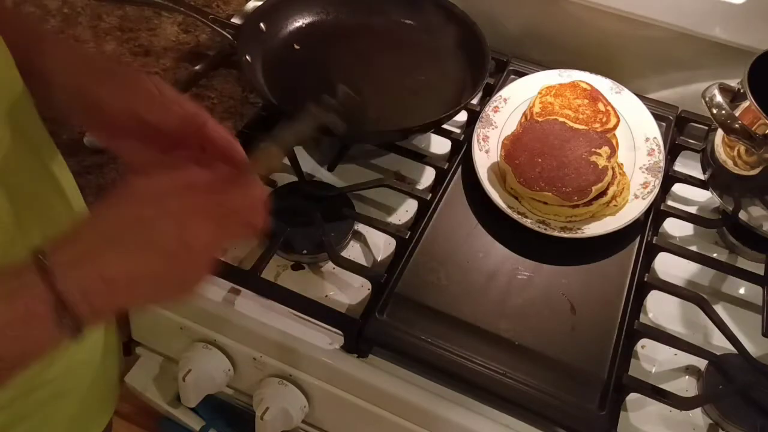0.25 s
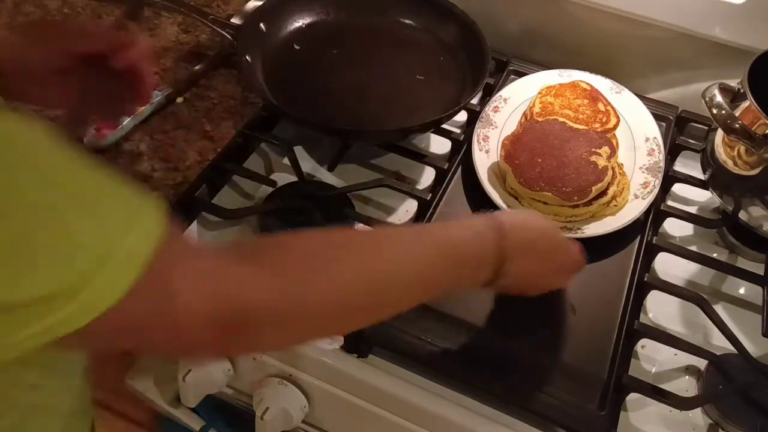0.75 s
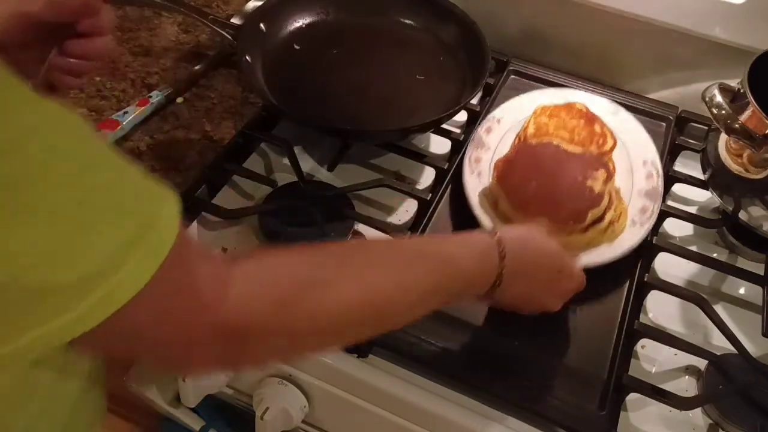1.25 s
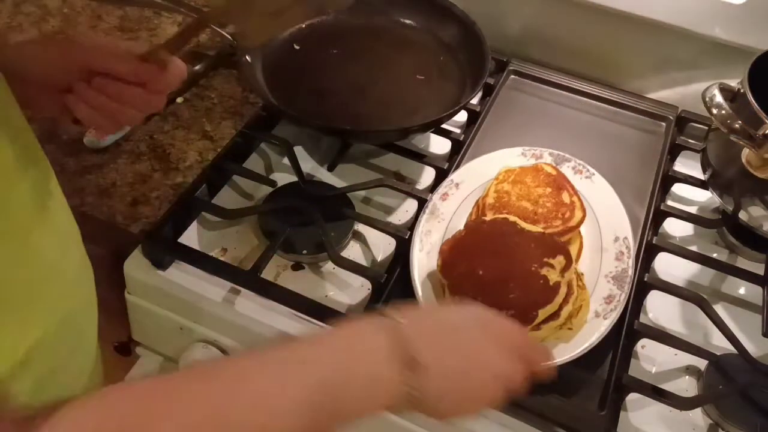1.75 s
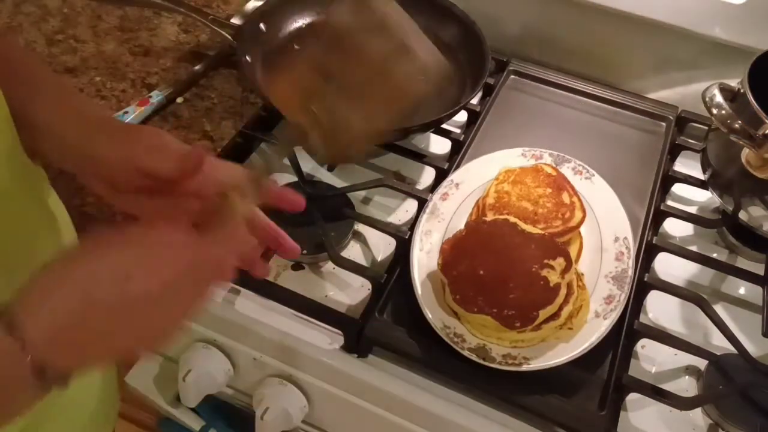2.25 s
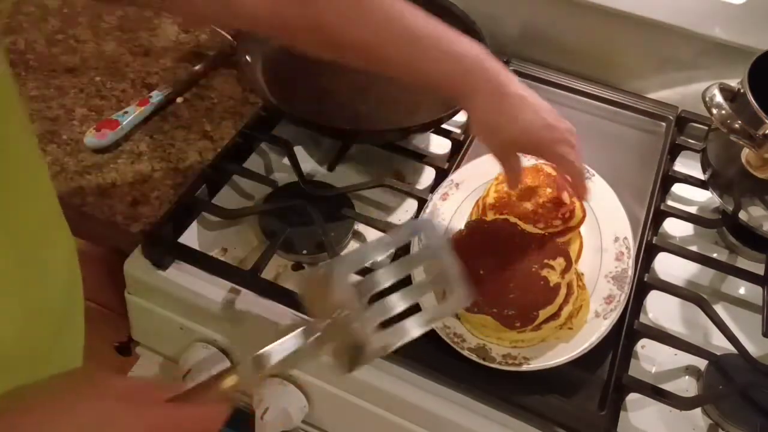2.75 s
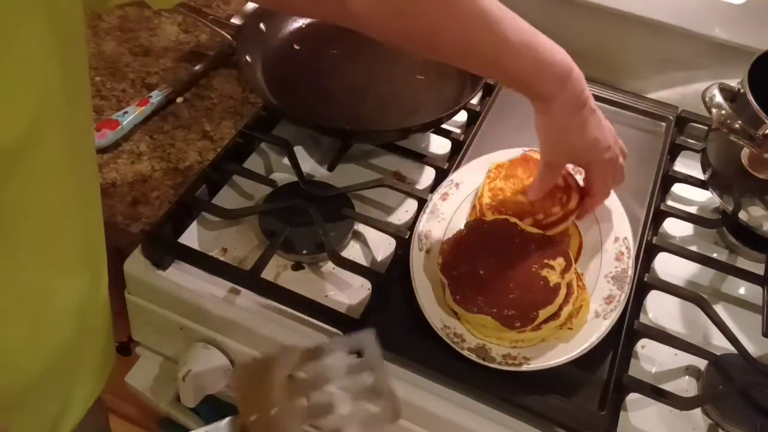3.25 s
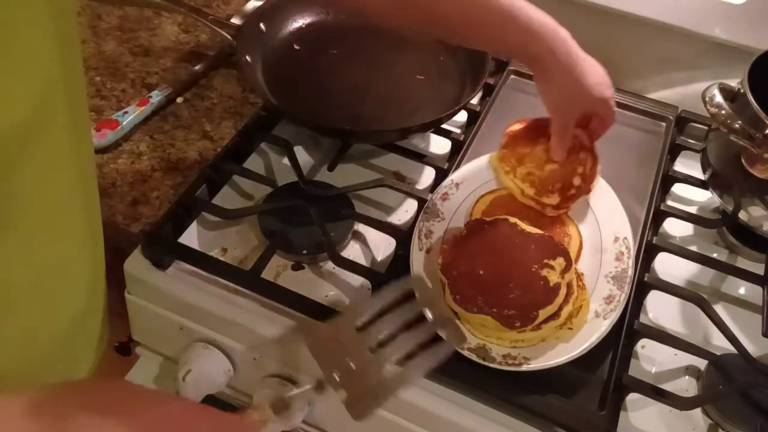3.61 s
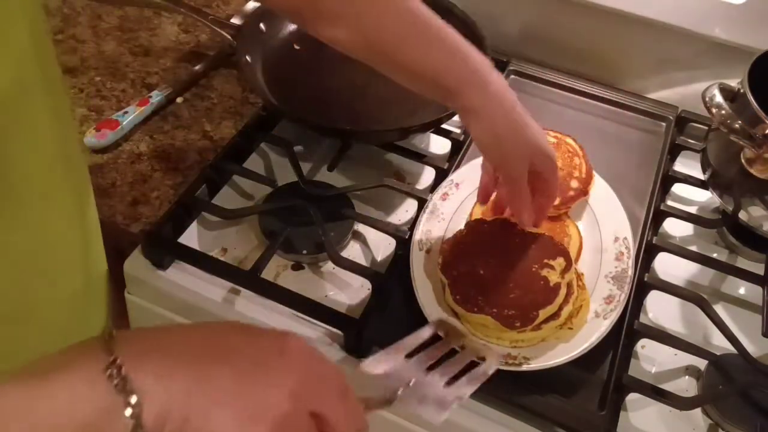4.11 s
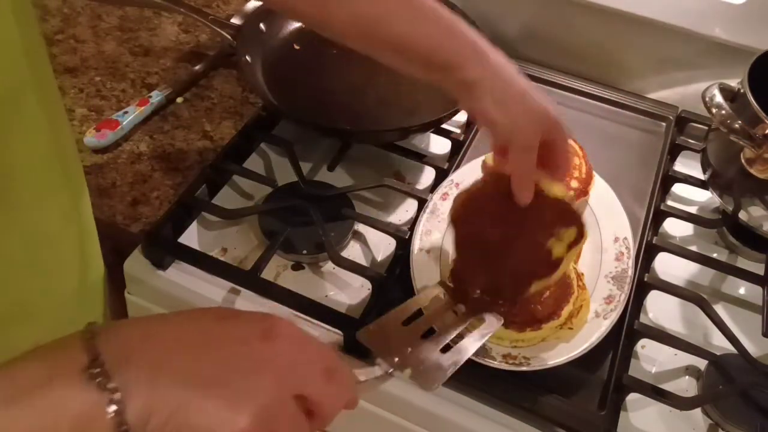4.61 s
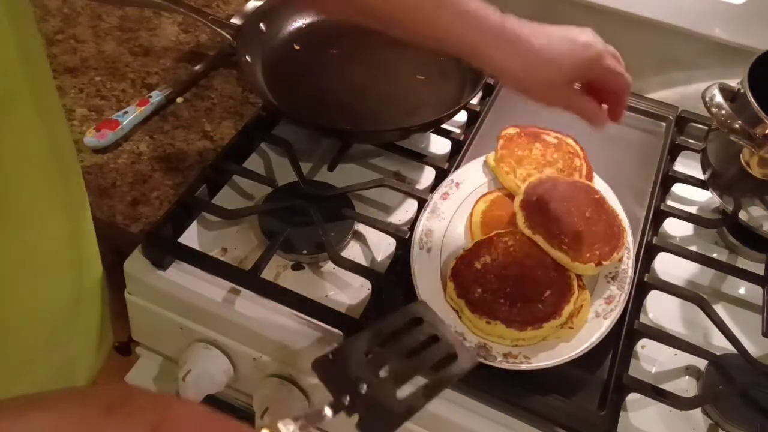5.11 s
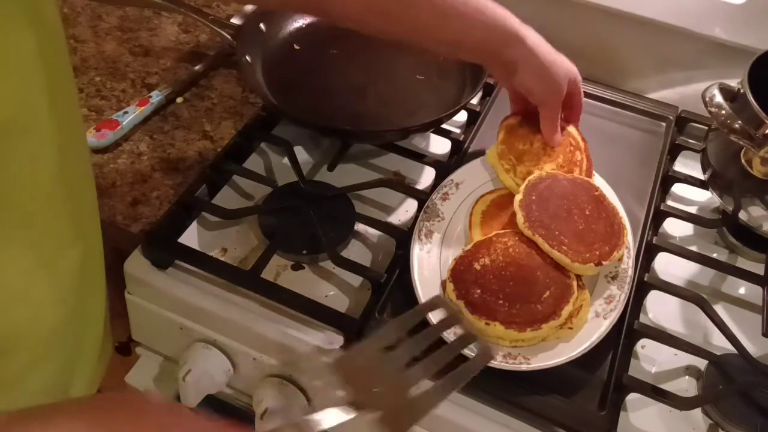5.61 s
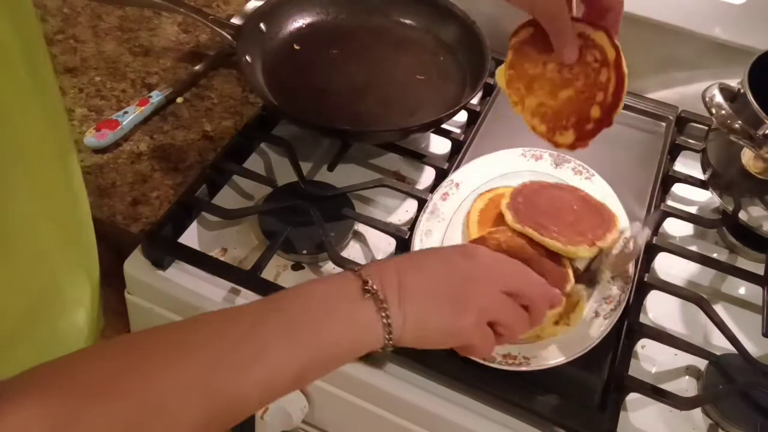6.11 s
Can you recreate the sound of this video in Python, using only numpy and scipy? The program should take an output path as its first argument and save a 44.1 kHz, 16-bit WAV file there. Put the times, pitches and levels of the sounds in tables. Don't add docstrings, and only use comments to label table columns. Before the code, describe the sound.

In a humming kitchen, a plate scrapes harshly over a stove griddle and bangs down, followed by spatula clinks, a second knock and faint crust crackle.

```python
import sys
import numpy as np
from scipy import signal
from scipy.fft import rfft, irfft, next_fast_len
from scipy.io import wavfile
from scipy.ndimage import uniform_filter1d

SR = 44100
rng = np.random.default_rng(int(sys.argv[2]) if len(sys.argv) > 2 else 0)


def volts(x):
    e = np.asarray(x, float) / 20
    return 10 ** e


def dump(signal):
    limited = np.clip(np.atleast_2d(signal).T, -1, 1)
    pcm = np.round(limited * 32767).astype(np.int16)
    wavfile.write(sys.argv[1], SR, pcm)


N = 280413
TIME = np.arange(N) / SR


def at(points, hz):
    f, v = np.transpose(points)
    return np.interp(np.log(np.maximum(hz, 1)), np.log(f), v)


def colour(x, points):
    n = next_fast_len(x.shape[-1] + 4096)
    log_gain = at(points, np.fft.rfftfreq(4096, 1 / SR)) * np.log(10) / 20
    cepstrum = irfft(log_gain)
    cepstrum[1:2048] *= 2
    cepstrum[2049:] = 0
    impulse = irfft(np.exp(rfft(cepstrum)))
    return irfft(rfft(x, n) * rfft(impulse, n), n)[..., :x.shape[-1]]


def band(x, lo_hz, hi_hz, order=2):
    sos = signal.butter(order, [lo_hz, min(hi_hz, .45 * SR)], "band", fs=SR, output="sos")
    return signal.sosfilt(sos, x)


def ring(x, hz, width_hz):
    return signal.lfilter(*signal.iirpeak(hz, hz / max(width_hz, 1), SR), x)


def unit(x):
    return x / np.sqrt(np.mean(x ** 2))


def walk(rate, size=N):
    k = int(SR / rate)
    held = np.repeat(rng.standard_normal(size // k + 1), k)
    return 0.93 * uniform_filter1d(uniform_filter1d(held, k), k)[:size]


def grains(size, share, scatter_db):
    u = rng.random((3, size))
    sign = np.sign(u[1] - .5)
    return unit((u[0] < share) * sign * volts(-scatter_db * np.log(1 - u[2])))


def swell(s, db, rise, fall):
    late = TIME[:, None] - s
    return np.sum(volts(db) * np.exp(-(late / np.where(late < 0, rise, fall)) ** 2), axis=1)


def add(out, x, s):
    i = int(s * SR)
    out[i:i + len(x)] += x[:N - i]


# time in seconds, gain in dB.
SLOW_GAIN = [(0, -0.5), (.6, 7.5), (1.2, 8), (1.5, 1.5), (1.9, 0), (2.08, -1.5), (2.7, 3), (3.7, 7.5),
             (4.3, 6.5), (5.0, 6.5), (5.1, 6), (5.6, 7.5), (6.36, 8.5)]


def slow_gain_db():
    return np.interp(TIME, *np.transpose(SLOW_GAIN))


# start in seconds, depth in dB, release in seconds.
DUCKS = [
    (1.114, 6, 0.092),
    (1.751, 13.5, 0.075),
    (5.05, 9.5, 0.11),
]


def gain_db():
    db = slow_gain_db()
    for s, depth_db, release in DUCKS:
        late = np.maximum(TIME - s - .025, 0)
        db = db - depth_db * np.clip((TIME - s) / .003, 0, 1) * np.exp(-late / release)
    return db


# peak in seconds, casing ring in dB, thud in dB, fall in seconds.
STEPS = [(.09, -43.5, -57.5, 0.12), (0.301, -42.5, -51, 0.17), (.5, -46, -53.5, 0.13),
         (1.26, -62, -56.5, 0.13), (1.65, -70, -53, 0.05), (1.85, -75, -54, 0.11),
         (3.122, -39.5, -84, 0.14), (3.54, -42.5, -71, 0.062), (3.77, -73, -59.5, 0.31),
         (4.11, -68, -57, 0.07), (5.1, -43, -49, 0.11), (5.26, -48, -52.5, 0.069)]


def fridge():
    s, shake_db, thud_db, fall = np.transpose(STEPS)
    rise = .08
    shake, gain = swell(s, shake_db, rise, fall), volts(slow_gain_db())
    noise = rng.standard_normal((5, N))
    casing = np.sin(2 * np.pi * 203 * TIME) * np.sqrt(2) + volts(-6.0) * unit(ring(noise[0], 203, 4.1))
    buzz = np.sin(2 * np.pi * 240 * TIME) * np.sqrt(2) + volts(-6.5) * unit(ring(noise[1], 243, 24))
    rumble = unit(band(noise[2], 88, 185))
    for hz, db in [(101, -2), (121, -5.5), (152, -1.0)]:
        rumble = rumble + volts(db) * unit(ring(noise[2], hz, 5.1))
    cabinet = unit(band(noise[3], 350, 430))
    for hz, db in [(342, 7.0), (360, 6.0), (385, -18.0)]:
        cabinet = cabinet + volts(db) * unit(ring(noise[3], hz, 5))
    thuds = swell(s, thud_db, rise, fall) + volts(-84.5)
    steps = thuds * unit(band(noise[4], 51, 120, order=3))
    cabinet_level = (volts(-64.0) * gain + volts(-21.5) * shake) * volts(2.0 * walk(3.0))
    return ((volts(-54) * gain + shake) * unit(casing)
            + (volts(-55.5) * gain + volts(-5.0) * shake) * unit(buzz)
            + (volts(-67) * gain + volts(-21) * shake) * unit(rumble)
            + cabinet_level * unit(cabinet) + steps)


# frequency in Hz, level in dB per Hz.
HISS_TONE = [(260, -36.5), (400, -9), (620, 1), (900, -7), (1750, -13), (2800, -17), (3720, -14.5),
             (4500, -22), (5100, -12.5), (7500, -6), (8300, -19.5), (9600, -26.5), (11000, -40),
             (15800, -58.5)]
# frequency in Hz, width in Hz, level in dB.
FAN = [(800, 40, -6), (2530, 60, -12), (3420, 50, -14), (3700, 70, -15), (5030, 120, -11), (6200, 110, -5),
       (7350, 130, -2)]


def air():
    white = rng.standard_normal((3, N))
    overtones = sum(volts(db + 6.5 * walk(5.7)) * unit(ring(white, f, w)) for f, w, db in FAN)
    hiss_db = -66.5 + 1.2 * walk(11) + 2.5
    hiss = (unit(colour(white, HISS_TONE)) + volts(-7.5) * overtones) * volts(hiss_db)
    whine_db = -79.5 + 3 * np.minimum(TIME, 4) + 0.5 + 2.2 * walk(2.9)
    whine = volts(whine_db) * np.sin(2 * np.pi * 5022 * TIME)
    return volts(-14.5) * hiss[0] + whine, volts(1.0) * hiss[1:]


# frequency in Hz, time to fall 60 dB in seconds.
ROOM_T60 = [(100, .38), (800, 0.23), (1800, 0.26), (12000, 0.18)]


def room(x):
    t = np.arange(int(.6 * SR)) / SR
    octaves = 100 * 2 ** np.arange(8)
    noise = rng.standard_normal((2, len(t))) * np.clip(t / 0.011, 0, 1)
    tail = sum(band(noise, f, 2 * f) * volts(-60 * t / at(ROOM_T60, 1.4 * f)) for f in octaves)
    return signal.fftconvolve(x[None], tail / np.sqrt(np.sum(tail[0] ** 2)), axes=1)[:, :N]


# start in seconds, peak in dB, pitch in Hz, length in seconds.
TICKS = [(0.401, -45, 7430, 0.039), (0.487, -50.5, 7060, 0.034), (0.926, -46, 7630, 0.0039),
         (0.962, -54, 9360, 0.0052), (0.998, -52.5, 8760, 0.0061), (2.65, -57.5, 5050, .01),
         (3.4603, -41, 7350, 0.004), (4.616, -40, 7640, 0.0046), (5.728, -48.5, 7000, .02),
         (6.319, -50, 7300, 0.011)]


def ticks():
    out, t = np.zeros(N), np.arange(SR // 8) / SR
    for s, db, hz, length in TICKS:
        push = rng.standard_normal(len(t)) * np.exp(-t / max(length, .001))
        tick = unit(ring(ring(push, hz, 1100), hz, 1100)) + volts(-16.5) * unit(band(push, 5000, 15000))
        add(out, tick * volts(db) / np.abs(tick).max(), s - .001)
    return out


# peak in seconds, level in dB, rise in seconds, fall in seconds.
PEELS = [(3.25, -58, 0.024, 0.045), (3.469, -49.5, 0.007, 0.042), (3.559, -43, 0.089, 0.056),
         (4.525, -60, 0.03, 0.021), (4.68, -43.5, 0.055, 0.086), (4.743, -38, 0.031, 0.019),
         (5.791, -41.5, 0.069, 0.037), (5.829, -45, 0.029, 0.011), (6.055, -52, 0.014, 0.034),
         (6.14, -48.5, 0.031, .022)]
# frequency in Hz, level in dB per Hz.
CRUST = [(600, -58), (1100, -19), (2000, -14.5), (3300, -5), (4500, 1.5), (6000, 1), (7400, 7.5),
         (8500, -6), (10000, -17), (15500, -18)]


def peels():
    rub = rng.standard_normal(N) + volts(-3.5) * grains(N, 0.093, 7.1)
    crust = colour(rub, CRUST) * volts(2.0 * walk(90))
    layers = [unit(band(crust, lo, hi)) for lo, hi in [(700, 3480), (4500, 11200), (9900, 18600)]]
    low, mid, top = (layer * volts(2.5 * walk(35)) for layer in layers)
    stroke = swell(*np.transpose(PEELS))
    return stroke * (mid + volts(-6.5) * low) + volts(-1.5) * stroke ** 1.3 * top


# time in seconds, level in dB.
DRAG = [(1.145, -34), (1.18, -35), (1.215, -22), (1.3, -19), (1.45, -21.5), (1.56, -22), (1.635, -26.5),
        (1.72, -43)]
PLATE_HZ = [746, 933, 996, 1203, 1280, 1429, 1464, 1576, 1879, 2002, 2175, 2276, 2595, 2921, 3340, 3510,
            3916, 4140, 4480, 4781, 5305, 5676, 5908, 6060, 6200, 6883, 7120, 7485, 8320, 8710, 9280, 9700,
            9950, 10350, 10900, 11350, 11850, 12400]
# width in Hz, dB early in the slide, dB late.
PLATE = [(8, -9, -14), (16, -7.5, -5), (14, -10.5, -7), (28, 0.5, -1.5), (25, -2.5, -7.5), (14, 0, 2),
         (13.9, -2.5, -2), (9, -11, -9.5), (20, -2, -2.5), (14, -11, -10.5), (18.03, 2, -3.5), (14, -5, -1),
         (18, -2, -4.5), (18, -3.5, -10), (40, -16.5, -10.5), (40, -13.5, -12.5), (22, -6.5, -13),
         (22, -21.5, -17.5), (40.1, -17.5, -15), (12, -7.5, -7.5), (25, -19, -14.5), (13.01, -12.5, -8),
         (13.05, -9.5, -17), (14, -20.5, -16), (14, -23.5, -12), (20, -5, -13.5), (30, -19.5, -14.5),
         (24.8, -18, -14.5), (20, -24, -24), (11, -20, -21), (16, -25.5, -27), (16, -33, -28.5),
         (18, -28, -27.5), (20, -41, -39), (14, -29.5, -38), (16.1, -34, -31), (16, -31, -29),
         (14, -48, -38)]
# frequency in Hz, level in dB per Hz.
GRIT = [(310, -63), (520, -23.5), (738, -4.5), (1410, 1.5), (1750, -11), (2230, -13), (2650, -8.5),
        (3120, -13), (3920, -11.5), (4190, -21.5), (4670, -20.5), (7090, -15.5), (8400, -33), (9300, -56),
        (15000, -85.5)]


def drag():
    s, level_db = np.transpose(DRAG)
    size = int((s[-1] - s[0]) * SR)
    t = np.arange(size) / SR
    db = np.interp(s[0] + t, s, level_db)
    edge_db = -11.5 + 7 * t - 6.0 * np.exp(-t / .05)
    griddle_db = -13 - 7.5 * t
    slip = grains(size, .3, 1.3) * volts(2.0 * walk(160, size=size))
    moved = np.clip((t - .13) / 0.23, 0, 1)
    modes = np.zeros(size)
    for k, (hz, (width, early, late)) in enumerate(zip(PLATE_HZ, PLATE)):
        mode_db = early + (late - early) * moved + 4.2 * walk(28, size=size)
        modes += (-1) ** k * volts(mode_db) * ring(ring(slip, hz, 1.3 * width), hz, 600)
    body = unit(modes) + volts(1.0) * unit(colour(slip, GRIT))
    griddle = band(ring(slip, 368, 17) + volts(-4) * ring(slip, 430, 50.8), 320, 440)
    edge = unit(band(body, 3600, 15000, order=3)) * volts(3.7 * walk(30, size=size))
    middle = unit(band(body, 650, 3600, order=3))
    out = np.zeros(N)
    add(out, volts(db) * (middle + volts(edge_db) * edge + volts(griddle_db) * unit(griddle)), s[0])
    return out


# frequency in Hz, width in Hz, level in dB.
TIP = [(451.4, 25, -4), (990, 25, -3), (1425, 30, 4), (1880, 30, -8), (2185, 40, 0), (2590, 30, -4),
       (2925, 30, -5), (3480, 56, -17), (4780, 30, -30), (6000, 56, -28.5), (6880, 36, -20),
       (8200, 36, -49.5)]
CATCH = [(362, 11, -5), (601, 40, -5.5), (1026, 13, 6.5), (2124, 23, -4), (2560, 49, -13.5),
         (6310, 20, -24.5), (7250, 220, -24), (7240, 22, -21), (8320, 50, -41.5)]
DROP = [(1030, 9.1, -21.5), (1395, 30, 0), (1610, 45.8, -5), (1913, 92, -5.5), (2242, 22.3, -0.5),
        (2600, 10, -3.5), (2870, 49, -9), (3630, 11.2, -10.5), (3963, 64, -18), (5600, 46.6, -18),
        (5670, 35.4, -23.5), (7060, 30, -11), (8280, 30, -41.5)]
NUDGE = [(1006, 60, -2), (1260, 55, 0), (2640, 40, -7), (4700, 40, -4), (7200, 60, -13)]
THUD = [(330, 35, -1), (514, 40, 0), (800, 55, -18), (1400, 97, -24)]
RIM = [(1013, 27, -7), (1308, 29, -12), (1859, 18, -5.5), (2010, 68, -6.5), (2420, 15, -11.5),
       (2654, 9, 5.5), (3640, 18, -14), (3960, 30, -22), (4651, 50, -10.5), (5800, 82, -15.5),
       (5940, 21, -17), (7204, 26, 0.5), (8600, 24, -20), (9600, 64, -27)]
EDGE = [(587, 16, -7.5), (1125, 24, -5.5), (1750, 39, -11), (2260, 30, -6), (2580, 9, -6.5), (3380, 11, -9),
        (3714, 90, -12.5), (4710, 48, -12), (6000, 30, -6), (5830, 77, -12), (6780, 150, -23),
        (7110, 18, -0.5), (8600, 35, -18), (9670, 42, -33)]
TINK = [(1860, 23, -4), (2580, 28, -7.5), (3560, 26, -4), (4550, 23, -12), (5770, 38, -15), (7270, 34, 0.5),
        (8470, 39, -21.5), (11900, 30, -38.5)]
BLADE = [(1050, 38, 3.5), (1700, 6.9, -5), (2570, 16, -8.5), (3700, 32, -7), (4620, 36, -12),
         (5720, 25, -10), (5900, 28, -10), (7120, 16, 1.5), (7980, 57, -9), (8270, 100, -13.5),
         (9260, 44, -21), (10000, 77, -26)]
ROCK = [(364, 20, -9.5), (800, 41, -3), (971, 33, 3.5), (1340, 34, -1), (1870, 82, -7), (2246, 80, -5),
        (2820, 44, -16), (3240, 20, -12), (5910, 81, -35), (6100, 36, -18.5), (7080, 66, -25.5),
        (8860, 32.4, -54)]
CHINK = [(1090, 50, -10), (1880, 40, -9), (2657, 18, -6.5), (3660, 20, -1), (4680, 37, -10), (5920, 30, -8),
         (7000, 40, -1), (7500, 40, -1), (8500, 24, -1), (9800, 60, -18)]
GRAZE = [(2660, 18, -8), (4160, 24, -7.5), (5000, 31, -15), (5440, 49, -2.5), (7460, 38, 4),
         (7850, 110, -19), (8750, 57, -16), (9860, 29, -36), (10900, 75, -30), (11600, 58, -37)]
REACHED = [TIP, CATCH, DROP, NUDGE, THUD, RIM, EDGE, TINK, BLADE, BLADE, ROCK, TINK, CHINK,
           GRAZE, GRAZE, GRAZE, RIM]
# start in seconds, peak in dB, rattle in seconds, damping factor, room level in dB.
BLOWS = [(1.1287, -10, 0.0083, 1.54, -16.5), (1.612, -9.5, 0.0054, 2.2, -24), (1.77, -5.5, 0.011, 1.8, -13),
         (3.064, -48.5, 0.008, 1.1, -21), (3.091, -42, 0.022, 1.3, -14), (3.742, -19.5, 0.009, 2.04, -9.5),
         (4.177, -20, 0.023, 1.7, -14), (4.267, -43.5, 0.0054, 0.7, -21), (5.027, -33.5, 0.0099, 2.5, -18),
         (5.035, -15, 0.0096, 4, -24), (5.063, -8.5, 0.0072, 0.68, -14), (5.164, -24, 0.0057, 1.2, -7),
         (5.864, -35, 0.008, 1.2, -10), (6.049, -36.5, .012, 0.78, -10), (6.099, -49, 0.018, 1.3, -14),
         (6.127, -41, 0.022, 1, -7), (6.349, -30.5, 0.0044, 1.9, 2)]
HEAVY = [0, 1, 2, 10]
# frequency in Hz, level in dB per Hz.
SHAKE = [(150, -23.5), (250, -10), (758, -4), (830, 0), (908, -2.5), (1210, -14), (1320, -5.5), (3060, -26),
         (7190, -28), (9000, -56), (12500, -100)]
# frequency in Hz, level in dB per Hz.
BOOM = [(150, -52), (250, -25), (337, -10.5), (529, -13.5), (736, -0.5), (1240, -6), (1680, -8),
        (1890, 0.5), (2040, -5.5), (2550, -9.5), (7190, -25.5), (9000, -48), (12500, -90)]
# frequency in Hz, width in Hz, level in dB.
AFTER_DROP = [(747, 16, -10), (1000, 16, -4), (1277, 11, -2.5), (1396, 12, -2), (1588, 10, -2.5),
              (1900, 10, -3), (2186, 14, -1.5), (2536, 10, -5), (2770, 9.1, -9), (3170, 10, -7),
              (3510, 14, -15), (4043, 14, -15), (4759, 14, -19.5), (5750, 14, -15.5)]
# frequency in Hz, width in Hz, level in dB.
AFTER_ROCK = [(355, 14, -2.5), (600, 14, -22), (728, 14, -5.5), (894, 16, -4.5), (992, 16, -2.5),
              (1318, 30, -10), (1588, 10, -18), (1667, 10, -14), (1895, 10, -10), (2180, 10, -13),
              (2420, 10, -17), (2670, 8.5, -17)]


def stove(push, rocking):
    t = np.arange(len(push)) / SR
    tone, after = (SHAKE, AFTER_ROCK) if rocking else (BOOM, AFTER_DROP)
    modes = sum(volts(g) * ring(ring(push, f, w), f, 300) for f, w, g in after)
    shake = unit(colour(push, tone)) + volts(-3.5) * unit(modes)
    return unit(shake) * np.exp(-(t / 0.081) ** 1.48) * volts(1.6 * walk(70, size=len(t)))


def blows():
    near, feed, t = np.zeros(N), np.zeros(N), np.arange(SR // 2) / SR
    for k, ((s, db, rattle, damping, room_db), modes) in enumerate(zip(BLOWS, REACHED)):
        rise = .0022 if k in HEAVY else .0057 if modes is GRAZE else .0013
        noise = rng.standard_normal((2, len(t))) * np.clip(t / rise, 0, 1)
        push = noise[0] * np.exp(-np.maximum(t - rise, 0) / max(rattle, .001))
        rings = unit(sum(volts(g) * ring(push, f, damping * w) * (-1) ** j
                         for j, (f, w, g) in enumerate(modes)))
        lowest, highest = modes[0][0], modes[-1][0]
        crack_tone = [(0.43 * lowest, -45)] + [(f, g) for f, w, g in modes] + [(14000, -48.5)]
        crack = unit(colour(push, crack_tone))
        blow = band(rings + volts(-6.5) * crack, .5 * lowest, 0.86 * highest, order=3)
        if modes is BLADE or modes is RIM:
            blow = blow + volts(-37) * unit(band(push, 9000, 15500))
        top = np.abs(blow).max()
        add(near, volts(db) * blow / top, s - .001)
        if k in HEAVY:
            shake = stove(noise[1], modes is ROCK)
            add(near, volts(db + room_db - 2.5) * shake, s)
            add(feed, volts(db + room_db - 5) * shake, s)
        else:
            add(feed, volts(db + room_db) * (crack + volts(7.5) * rings) / top, s - .001)
    add(near, volts(-32) * np.sin(2 * np.pi * 1885 * t) * volts(-60 * (t / 0.34) ** 2), 1.775)
    return near, feed


# frequency in Hz, loss in dB.
SHADE = [(60, 9.5), (200, 7.5), (380, 9), (1290, 12), (2380, 13.5), (4400, 14), (7500, 18.5), (9300, 1),
         (15000, 4)]


def scene():
    undo, slow_undo = volts(-gain_db()), volts(-slow_gain_db())
    hit, feed = blows()
    plate = drag() * undo
    soft = (peels() + ticks()) * undo
    hiss, diffuse = air()
    hum = volts(4.5) * fridge() * slow_undo
    hard = plate + hit * undo
    near = volts(6.5) * hard + hum + hiss
    to_room = volts(-3.0) * plate + volts(-1) * feed * undo + volts(-4.0) * soft + volts(-11.5) * hum
    wide = diffuse + room(to_room)
    direct = near + volts(8.5) * soft
    left = np.roll(direct, 34) + wide[0]
    t = np.arange(SR // 20)
    scatter = rng.standard_normal(len(t)) * np.exp(-t / 1000)
    scattered = signal.fftconvolve(direct, scatter / np.linalg.norm(scatter))[:N]
    bounce = band(scattered, 1600, 23000, order=1)
    right = near + volts(-8.0) * hard + volts(-5.0) * soft + volts(5.0) * bounce + wide[1]
    return np.array([left, colour(right, [(f, -db) for f, db in SHADE])])


def band_limit(x):
    return signal.sosfilt(signal.butter(12, 15850, fs=SR, output="sos"), x)


def record(dry):
    x = dry * volts(gain_db())
    over = np.maximum(np.abs(x) - .7, 0)
    x = np.sign(x) * (np.abs(x) - over + .2 * np.tanh(over / .2))
    top_cut = signal.ellip(8, .2, 70, 15800, fs=SR, output="sos")
    mix = signal.sosfilt(top_cut, x)
    return band_limit(mix)


dry = scene()
out = record(dry)
dump(out)
```